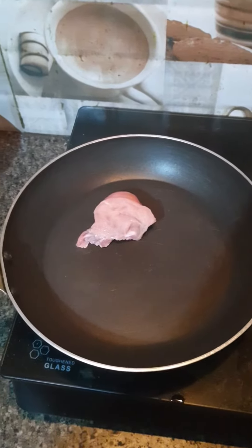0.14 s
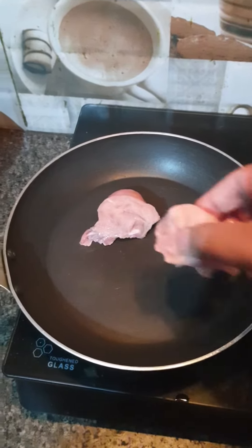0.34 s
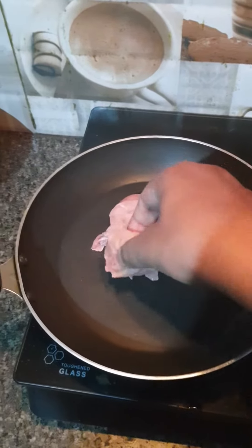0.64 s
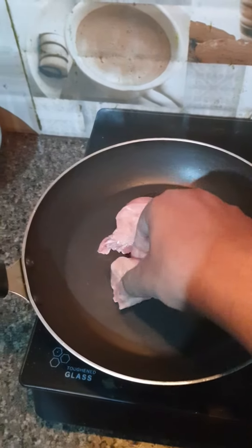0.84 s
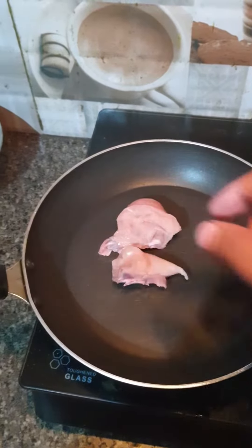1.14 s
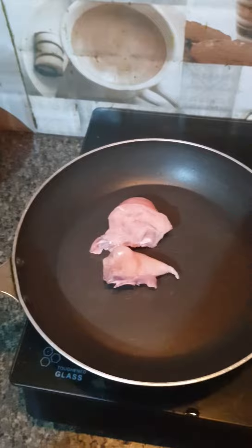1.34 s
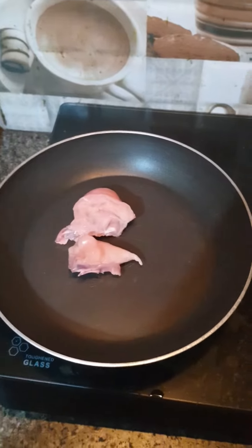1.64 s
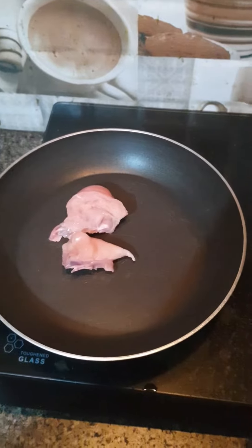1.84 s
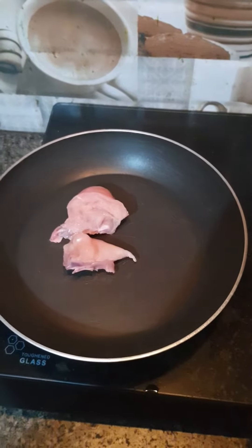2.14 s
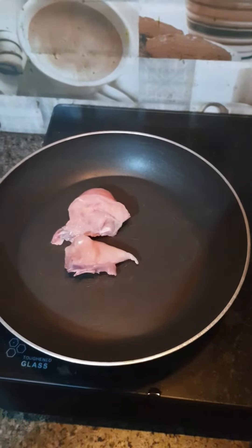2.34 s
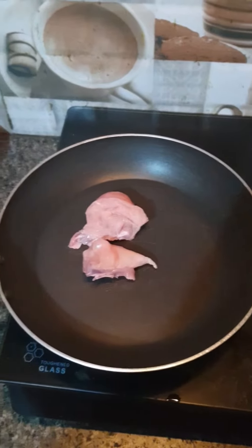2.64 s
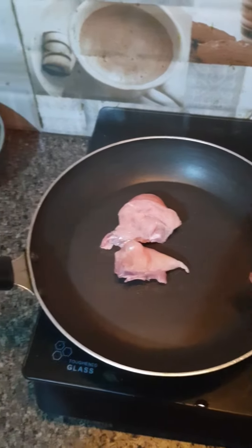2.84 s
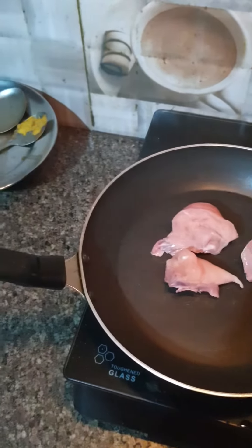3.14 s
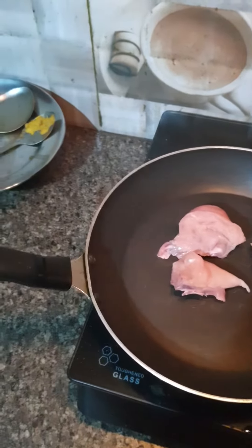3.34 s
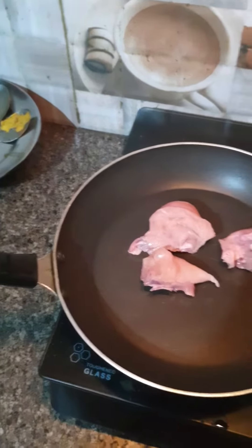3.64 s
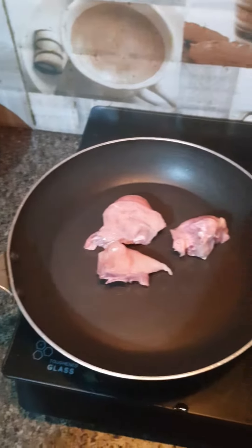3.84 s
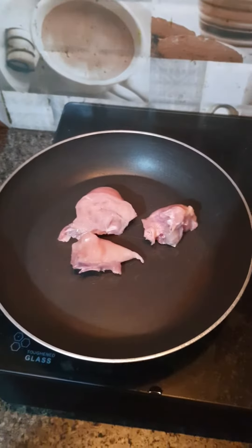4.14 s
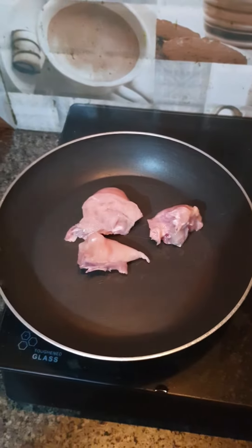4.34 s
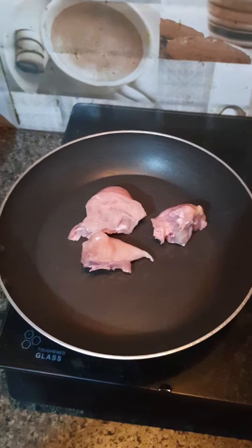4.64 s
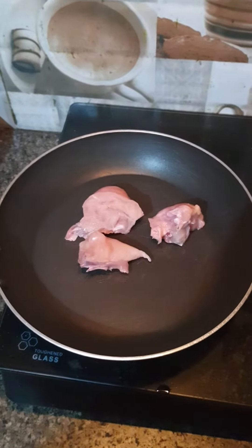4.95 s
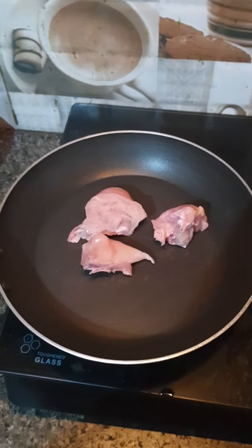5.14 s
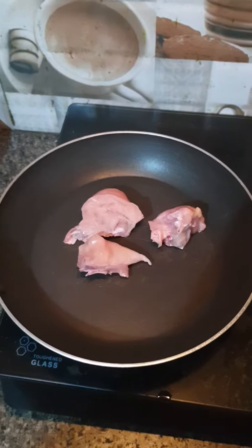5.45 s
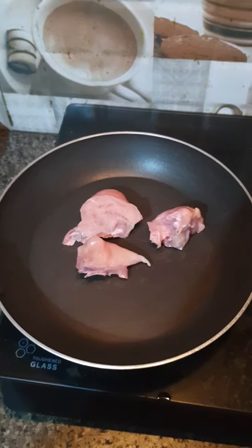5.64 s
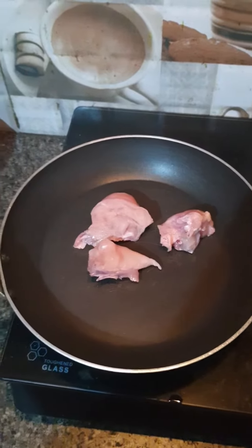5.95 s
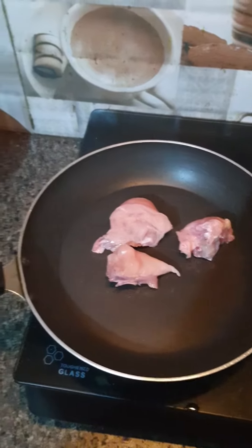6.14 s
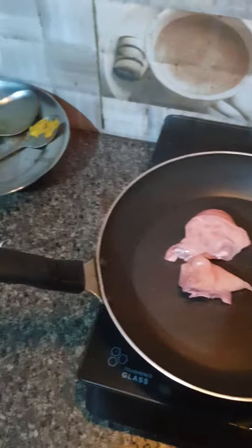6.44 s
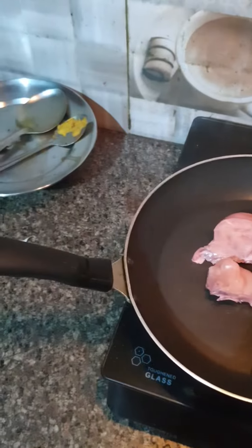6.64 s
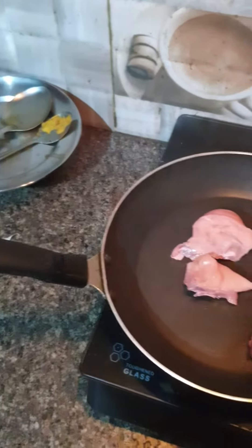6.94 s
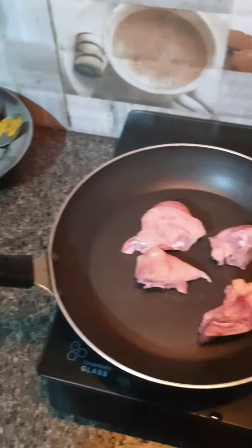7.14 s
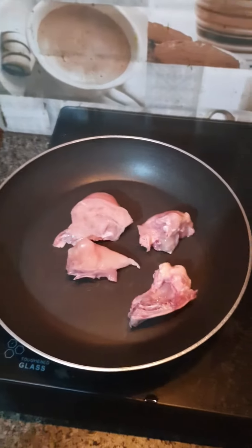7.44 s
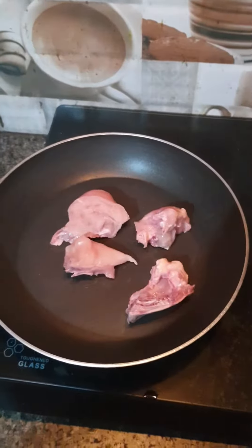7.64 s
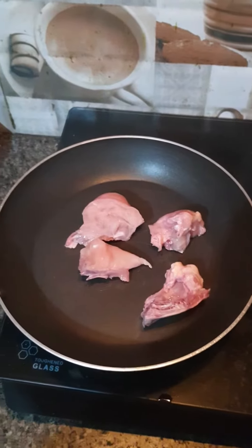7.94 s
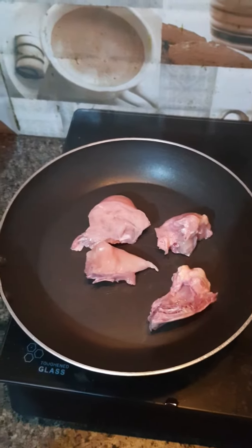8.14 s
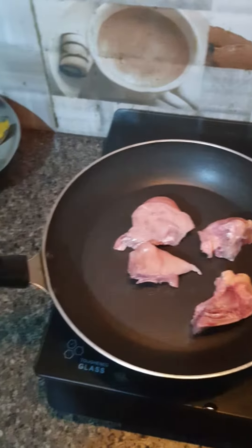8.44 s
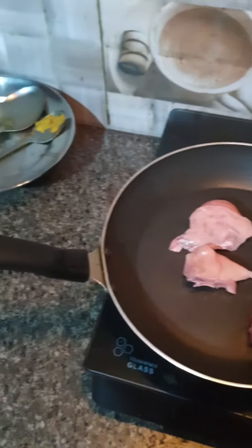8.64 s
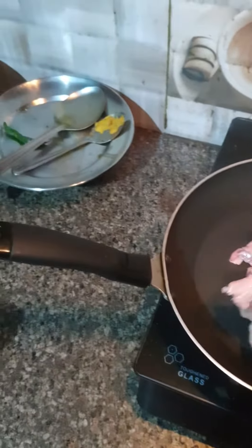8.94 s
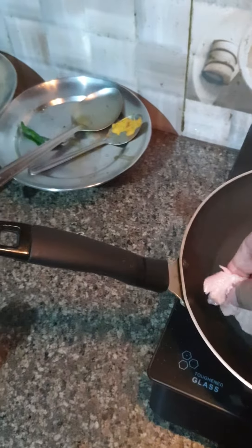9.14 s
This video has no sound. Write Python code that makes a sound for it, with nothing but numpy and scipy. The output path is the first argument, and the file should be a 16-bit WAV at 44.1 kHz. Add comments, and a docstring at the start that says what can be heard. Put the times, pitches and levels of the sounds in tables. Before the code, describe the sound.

Close phone pickup in a small kitchen: an induction cooktop hums low and its fan whirs throughout. Meat sizzles faintly, flares as a second piece flops in, then surges much louder after a steel clink when another is laid down. Sharp fat spits cluster through the middle with a clink and a counter thump, a further piece brings a fresh hiss, and the frying settles.

```python
"""Meat already fries in a pan on an induction cooktop, close to a phone in a small kitchen: bubble bursts make the hiss.
All along, sines at twice the mains rate and its octave make the coil hum; wavering tones and shaped noise make the fan.
A bump rings the counter, then a piece flops in: the sizzle surges, narrow noise bands hiss as steam, noise snaps spit.
Steel modes clink before a second piece goes in; more spits, clinks and bumps follow, and the housing sings briefly.
A third piece goes in near 7 s, a last clink and bump follow, and hum and fan air ease towards the end."""
import sys
import numpy as np
from scipy import signal
from scipy.fft import rfft, irfft
from scipy.io import wavfile

SR = 44100
rng = np.random.default_rng(int(sys.argv[2]) if len(sys.argv) > 2 else 0)


def bounce(signal):
    """Save signal as a 16-bit WAV file at the path given by the first command-line argument."""
    frames = np.transpose(np.atleast_2d(signal))
    limited = np.clip(frames, -1, 1)
    pcm = np.round(limited * 32767).astype(np.int16)
    wavfile.write(sys.argv[1], SR, pcm)


N = 409688
T = np.arange(N) / SR
FREQ = np.arange(N // 2 + 1) * SR / N
HUM_HZ = 99.95  # twice the mains rate
TOP_HZ = 15740  # upper limit of the phone

# pieces laid in the pan: start_s, rise_s, surge_db, settle_s (power falls to 1/e), lasting_db,
# fine_db and coarse_db (lasting spray and bubbling re main sizzle)
PIECES = [(1.09, 0.08, -39, 0.28, -32.5, -1.5, 0), (3.32, 0.28, -21.5, 0.21, -43.5, 9.5, 10.5),
          (6.83, 0.057, -28.5, 0.4, -37, -6, -8)]
# fan at the two ports: freq_hz, left_minus_right_db, likeness (-1 to 1)
FAN_STEREO = [(45, -2, .96), (80, -.3, .98), (130, -2.8, .96), (200, -.7, .97), (300, -4.5, .93),
              (400, -4, .93), (490, -2.8, .72), (700, -7.5, .62), (1300, -2.5, .1), (2500, -.5, .5),
              (8000, -2, .1)]


def undb(db):
    """Decibels to gain."""
    return 10 ** (np.asarray(db) / 20)


def unit(x):
    """Scale to rms 1."""
    return x / np.sqrt(np.mean(x ** 2))


def ports(pan_db):
    """Left and right gains for a left-minus-right level difference."""
    return undb(np.array([[.5], [-.5]]) * pan_db)


def across(table):
    """Columns of a table (Hz, ..) on the frequency grid, joined on a log axis."""
    hz, *columns = np.transpose(table)
    return [np.interp(np.log(FREQ + 1), np.log(hz), c) for c in columns]


def colour(x, gain):
    """Filter by a gain on the frequency grid."""
    return irfft(rfft(x) * gain, N)


def walk(rate_hz):
    """Smooth random signal of rms 1, low-passed near rate_hz."""
    return unit(colour(rng.standard_normal(N), 1 / (1 + (FREQ / rate_hz) ** 4)))


def band(x, lo_hz, hi_hz):
    """Causal band-pass."""
    sos = signal.butter(2, [lo_hz, min(hi_hz, SR / 2 - 1)], "band", fs=SR, output="sos")
    return signal.sosfilt(sos, x)


def fade(t, t60_s):
    """Exponential decay, 60 dB down after t60_s."""
    return np.exp(-np.log(1000) * t / t60_s)


def swell(middle_s, half_s):
    """Smooth rise and fall, 1 at its middle, 1/e at half_s either side."""
    return np.exp(-((T - middle_s) / half_s) ** 2)


def add(out, start_s, sound):
    """Mix a sound in at start_s."""
    i = int(start_s * SR)
    out[:, i:i + sound.shape[-1]] += sound[:, :N - i]


def struck(modes, t):
    """Free ring of a table of modes (Hz, dB, t60 s)."""
    return sum(undb(db) * np.sin(2 * np.pi * hz * t) * fade(t, t60_s) for hz, db, t60_s in modes)


def aside():
    """How far the hand swings the phone away from the pan, 0-1."""
    # swings aside and back: middle_s, half_s, reach (0-1)
    swings = [(0.844, 0.09, 0.8), (3.4, 0.95, 0.07), (6.665, 0.13, 1.0), (9.05, 0.66, 0.54)]
    return sum(reach * swell(middle_s, half_s) for middle_s, half_s, reach in swings)


def ripple(depth):
    """Gain that pulses with the power, twice in each mains cycle."""
    return 1 + depth * np.cos(2 * np.pi * HUM_HZ * T)


def frying():
    """Levels (dB) of main sizzle, spray and bubbling: each piece surges, settles and fries on; powers add."""
    # flares as wet meat touches metal or juice runs out: middle_s, half_s, level_db, fine_db (re level)
    flares = [(.6, 0.093, -43.5, -5), (.925, 0.073, -30.5, -2.5), (1.478, 0.29, -33.5, 0),
              (3.187, 0.096, -31.5, 2), (5.42, 0.13, -33, -7), (5.75, 0.17, -35, -5), (8, 0.45, -47, 9)]
    flare_coarse_db = -2.5
    first_db, first_fine_db, first_coarse_db = -39, -2.5, 2  # piece already frying
    surge_fine_db, surge_coarse_db = -0.5, 2.5
    parts = [(np.full(N, undb(first_db) ** 2), first_fine_db, first_coarse_db)]
    for start_s, rise_s, surge_db, settle_s, lasting_db, fine_db, coarse_db in PIECES:
        age_s = np.maximum(T - start_s, 0)
        contact = 1 - np.exp(-(age_s / rise_s) ** 2)
        surge = contact * undb(surge_db) ** 2 * np.exp(-age_s / settle_s)
        parts.append((surge, surge_fine_db, surge_coarse_db))
        parts.append((contact * undb(lasting_db) ** 2, fine_db, coarse_db))
    for middle_s, half_s, db, fine_db in flares:
        parts.append((undb(db) ** 2 * swell(middle_s, half_s), fine_db, flare_coarse_db))
    powers = sum(np.outer(undb([0, fine_db, coarse_db]) ** 2, power) for power, fine_db, coarse_db in parts)
    return 10 * np.log10(powers)


def bursts(per_second, spread_db, wash, scatter_s, room_db, room_t60_s, spots):
    """Steam bubbles burst at several spots; pan wall and tiles scatter each differently to the two ports."""
    out, t = 0, T[:SR // 4]
    for _ in range(spots):
        size = undb(spread_db * np.minimum(rng.exponential(size=N), 6))
        hits = rng.random(N) < per_second / spots / SR
        clicks = hits * size * rng.choice([-1, 1], N)
        decay = np.exp(-t / scatter_s) + undb(room_db) * fade(t, room_t60_s)
        paths = rng.standard_normal((2, len(t))) * decay
        out = out + signal.oaconvolve(clicks[None], paths, axes=1)[:, :N]
    return unit(unit(out) + wash * rng.standard_normal((2, N)))


def pan_ring(bubbling_db):
    """Noise rings the pan's resonances; random level changes at each, partly following the bubbling level."""
    # pan resonances: freq_hz, width_hz, level_db (before trim)
    pan_modes = [(1838, 32, -62), (2280, 200, -63), (2730, 80, -65), (3640, 120, -65), (3830, 90, -68)]
    trim_db, waver_db, follow = -0.4, 4.0, 0.38
    ring = 0
    for hz, width_hz, db in pan_modes:
        resonance = np.sqrt(SR / np.pi / width_hz) / (1 + 2j * (FREQ - hz) / width_hz)
        mode = colour(rng.standard_normal((2, N)), resonance)
        follow_db = follow * (bubbling_db - bubbling_db.mean())
        ring = ring + mode * undb(db + trim_db + follow_db + waver_db * walk(15))
    return ring


def sizzle():
    """Bubbles fry on hot metal, in three bands; the low band's level wavers at random, hiss shifts with phone."""
    # relative spectrum at each port: freq_hz, left_db_per_hz, right_db_per_hz
    spectrum = [(1300, -24, -26), (2360, -15, -15), (3200, -17, -15), (4000, -13, -13), (4850, -5, -4),
                (5400, -5, -2), (6100, -5.5, 0), (6800, -4.5, 3.3), (7600, -4, 4.8), (8400, -3.5, 1),
                (9100, -2.7, -4.5), (9600, -6, -10), (10100, -4.7, -11), (10700, -3.5, -5.6),
                (11400, -2, .7), (12200, -.5, 3.8), (13000, .4, 1.9), (14000, -1, -1.1), (14700, 1, 0),
                (15700, 1.2, .1)]
    coarse_below_hz, fine_above_hz = 5800, 10800
    flicker_db, low_waver_db, fine_trim_db = 0.2, 1.24, 0.8
    aside_pan_db, ripple_depth = -2.5, .007
    fry_db, spray_db, bubbling_db = frying() + flicker_db * np.array([walk(9.0) for _ in range(3)])
    steam = bursts(per_second=3500, spread_db=2.8, wash=0.52, scatter_s=0.00026,
                   room_db=-1.5, room_t60_s=0.097, spots=8)
    steam = unit(colour(steam, undb(across(spectrum))))
    fine = 1 / (1 + (fine_above_hz / (FREQ + 1)) ** 12)
    coarse = 1 / (1 + (FREQ / coarse_below_hz) ** 12)
    hiss = colour(steam, coarse) * undb(bubbling_db + low_waver_db * walk(15))
    hiss += colour(steam, 1 - coarse - fine) * undb(fry_db)
    hiss += colour(steam, fine) * undb(spray_db + fine_trim_db)
    return (hiss * ports(aside_pan_db * aside()) + pan_ring(bubbling_db)) * ripple(ripple_depth)


def steam_jets():
    """Steam squeezes out under the meat: a narrow noise band that holds or glides in pitch and flutters."""
    # jets: start_s, length_s, start_hz, end_hz, width_hz, level_db (before flutter), left_minus_right_db
    jets = [(1, 0.72, 6750, 6540, 660, -48.5, -18), (1, .65, 11000, 11000, 1900, -42, 2),
            (6.1, 1.1, 7800, 7260, 1300, -45, -12.5), (7.4, 0.69, 3100, 5290, 1018, -46, 1),
            (7.2, 2.2, 5300, 4910, 700, -50, -1)]
    edge_s, flutter_db = 0.083, 1.0
    out = np.zeros((2, N))
    for start_s, length_s, start_hz, end_hz, width_hz, db, pan_db in jets:
        gate = np.clip(np.minimum(T - start_s, start_s + length_s - T) / edge_s + .5, 0, 1)
        centre_hz = np.interp(T, [start_s, start_s + length_s], [start_hz, end_hz])
        low_pass = signal.butter(2, width_hz / 2, fs=SR, output="sos")
        rush = signal.sosfilt(low_pass, rng.standard_normal((2, N)))
        hiss = unit(rush * np.cos(2 * np.pi * np.cumsum(centre_hz) / SR))
        out += hiss * gate * undb(db) * ports(pan_db)
    return out * undb(flutter_db * walk(16))


def wall_echo(x):
    """A near reflection combs the hiss; its path drifts as the hand holding the phone moves."""
    lag_s, drift, share = .0015, .06, .18  # drift: rms fraction of the lag
    i = np.arange(N)
    delayed = [np.interp(i - lag_s * SR * (1 + drift * walk(0.46)), i, side) for side in x]
    return x + share * np.array(delayed)


def small_spits():
    """Small spits of fat at random moments after the first of the added pieces is laid in."""
    rate_hz, peak_db, scatter_db = 2.5, -24, 1.5  # count = rate times the whole length
    low_hz, treble_db, t60_s = 5500, 2, .005
    count = int(rate_hz * T[-1])
    times_s = rng.uniform(PIECES[0][0], T[-1], count)
    sizes = rng.standard_normal(count)
    return [(s, peak_db + scatter_db * size, low_hz, treble_db, t60_s) for s, size in zip(times_s, sizes)]


def spits():
    """A droplet explodes in the fat: a sharp noise snap and a short splash of reflections."""
    # loud spits: start_s, peak_db (mean of ports), low_hz, treble_db (gain re middle band), t60_s
    loud_spits = [(2.058, -22, 5500, 2, .006), (3.997, -17, 6500, 7, .004), (4.204, -13, 5400, 1, .03),
                  (4.428, -15.5, 5500, 6, .004), (4.675, -22, 4600, -3, .015), (5.378, -16, 6000, 5, .02),
                  (5.7455, -11.7, 5800, 5, .005), (5.799, -20, 7000, 6, .006),
                  (5.9405, -12.5, 5600, 4, .011), (5.953, -20, 5500, 0, .015)]
    tail_db, tail_t60_s, pan_db = -25, 0.11, -2
    out, t = np.zeros((2, N)), T[:SR // 8]
    for start_s, db, low_hz, treble_db, t60_s in loud_spits + small_spits():
        decay = fade(t, t60_s) + undb(tail_db) * fade(t, tail_t60_s)
        burst = rng.standard_normal((2, len(t))) * decay
        snap = band(burst, low_hz, 10500) + undb(treble_db) * band(burst, 11000, TOP_HZ)
        snap /= np.abs(snap).max(axis=1, keepdims=True)
        add(out, start_s, undb(db) * snap * ports(pan_db))
    return out


def flops():
    """Soft meat, let go by the fingers, drops on the pan, which answers with a short dull knock."""
    # flops: start_s, level_db
    drops = [(1.036, -36)]
    # loaded pan modes: freq_hz, level_db, t60_s
    thud_modes = [(335, -1, .12), (372, -3, .12), (662, 0, .16), (698, -2, .16), (1010, -12, .08)]
    push_s = .008
    out, t = np.zeros((2, N)), T[:SR // 4]
    for start_s, db in drops:
        knock = struck(thud_modes, t) * (1 - np.exp(-t / push_s))
        add(out, start_s, undb(db) * knock * ports(-6))
    return out


def clinks():
    """Steel touches steel: a brief chatter of contact rings a few modes over scrape and duller clatter."""
    # clinks: start_s, level_db, lowest_ring_hz, tilt_db_per_octave, scrape_db (re clink)
    contacts = [(3.116, -32.5, 1868, -16, -16), (3.122, -33.5, 1868, -1, -11), (3.133, -38, 1856, 4, -4),
                (5.6215, -38, 2165, -7, 11), (5.628, -40, 2290, -3, 11), (7.521, -33, 3644, -12, 9),
                (7.526, -39.5, 3460, -14, 8)]
    # thin steel modes: ratio (to lowest ring), level_db, t60_s
    steel_modes = [(1, -3, .09), (1.05, -12, .04), (1.5, -4, .06), (1.64, -11, .015), (1.87, -10, .015),
                   (2.055, -4, .06), (2.4, -14, .03)]
    contact_t60_s, scrape_t60_s = 0.07, 0.11
    clatter_db, clatter_t60_s = -8, 0.2
    out, t = np.zeros((2, N)), T[:SR // 2]
    for start_s, db, hz, tilt_db, scrape_db in contacts:
        contact, scrape, clatter = rng.standard_normal((3, 2, len(t)))
        chatter = contact * fade(t, contact_t60_s)
        sound = undb(scrape_db) * band(scrape, 3900, 8400) * fade(t, scrape_t60_s)
        sound += undb(clatter_db) * band(clatter, 900, 4400) * fade(t, clatter_t60_s)
        for ratio, mode_db, t60_s in steel_modes:
            mode = np.sin(2 * np.pi * hz * ratio * t) * fade(t, t60_s)
            ring = signal.fftconvolve(chatter, mode[None])[:, :len(t)]
            sound += undb(mode_db + tilt_db * np.log2(ratio)) * ring / np.abs(ring).max()
        add(out, start_s, undb(db) * sound)
    return out


def bumps():
    """A soft push rings the counter, booms in the cupboard below and shakes what stands on it."""
    # bumps: start_s, level_db
    pushes = [(.535, -31), (5.624, -35), (5.763, -20.5), (5.830, -32), (7.526, -33)]
    # counter and cooktop body modes: freq_hz, level_db, t60_s
    counter_modes = [(83, 1, .33), (136.6, -8, .13), (256, -12, .12), (318, -11, .15), (385, -12, .15),
                     (970, -23, .15), (1040, -21, .15), (1165, -23, .2)]
    push_s = .005
    rattle_db, rattle_t60_s = -5.5, .32
    boom_db, boom_t60_s = 2.5, .3
    out, t = np.zeros((2, N)), T[:SR // 2]
    for start_s, db in pushes:
        rattle = undb(rattle_db) * band(rng.standard_normal((2, len(t))), 200, 1200) * fade(t, rattle_t60_s)
        boom = undb(boom_db) * band(rng.standard_normal(len(t)), 50, 250) * fade(t, boom_t60_s)
        onset = 1 - np.exp(-t / push_s)
        add(out, start_s, undb(db) * (struck(counter_modes, t) + rattle + boom) * onset)
    return out


def coil():
    """Magnetic pull shakes pan and coil twice per mains cycle; the hum wavers and drops as the phone swings."""
    start_db, aside_db, sag_db, waver_db, octave_db = -30, -3, -2, 0.5, -29
    phase = 2 * np.pi * HUM_HZ * T + np.array([[0], [.25]])  # right port leads, rad
    tone = (np.sin(phase) + undb(octave_db) * np.sin(2 * phase)) * ports(-.7)
    level_db = start_db + aside_db * aside() + sag_db * (T / T[-1]) ** 2 + waver_db * walk(3.3)
    return np.sqrt(2) * tone * undb(level_db)


def fan_tones():
    """Fan and motor tones share the wandering shaft speed; turbulence makes each one flutter."""
    # tones: pitch_hz, level_db (before trim and panning), unsteadiness (0-1)
    tones = [(44, -65, .5), (49.5, -61, .6), (53, -58.5, .6), (66, -45.7, .15), (78, -54.5, .6),
             (93.5, -54.5, .5), (122, -54, .3), (132, -61, .1), (144, -53, .3), (176, -59.3, .4),
             (188, -63.7, .2), (220.5, -59.5, .3), (258, -61, 1), (298, -61, .8), (320.3, -51.3, .5),
             (324, -56, .7), (330.7, -53.3, .5), (342.7, -49.5, .35), (354, -60, .5), (376.3, -53, .4),
             (388, -57, .5), (408.5, -63.5, .6), (440.5, -65, .4), (490, -65, 1), (506.5, -62.5, .8),
             (554, -61.5, .5), (710.5, -65.5, .7)]
    wander, flutter_hz, trim_db = 0.0015, 3, 1.0  # wander: rms fraction of speed
    clock_s = T + wander * np.cumsum(walk(1)) / SR
    out = np.zeros(N)
    for hz, db, unsteady in tones:
        phase = 2 * np.pi * (hz * clock_s + rng.random())
        tone = (1 + unsteady * walk(flutter_hz)) * np.sin(phase)
        tone += unsteady * walk(flutter_hz) * np.cos(phase)
        out += undb(db + trim_db) * unit(tone)
    right_lead = np.exp(np.array([[0], [.2]]) * 1j)  # rad
    return colour(out, ports(across(FAN_STEREO)[0]) * right_lead)


def fan_air():
    """Turbulent air rings the housing, most alike at both ports in the bass; it eases towards the end."""
    # air through the housing, relative spectrum: freq_hz, density_db_per_hz
    air_spectrum = [(20, -26), (36, -21), (46, -27), (85, -3), (115, -3), (165, -12.5), (235, -16),
                    (335, -9.5), (460, -19.5), (700, -19.5), (1400, -25), (3000, -35), (8000, -31.5)]
    # housing resonances: freq_hz, width_hz, lift_db
    housing_modes = [(258, 7.3, -1), (413, 42, 4.5), (499.6, 26, 7), (623, 18, 5.5), (713, 29, 3)]
    start_db, late_db = -40, -2
    pan_db, likeness = across(FAN_STEREO)
    likeness = np.clip(likeness, -1, 1)
    mid, side = rfft(rng.standard_normal((2, N)))
    pair = np.sqrt(1 + likeness) * mid + np.sqrt(1 - likeness) * side * np.array([[1], [-1]])
    lift_db = sum(db / (1 + (2 * (FREQ - hz) / width_hz) ** 2) for hz, width_hz, db in housing_modes)
    air = unit(irfft(pair * ports(pan_db) * undb(across(air_spectrum)[0] + lift_db), N))
    return air * undb(start_db + late_db * (T / T[-1]) ** 2)


def housing_song():
    """One resonance of the housing sings out for a moment."""
    middle_s, half_s, pitch_hz, level_db = 6.27, .06, 507, -49
    return np.sqrt(2) * undb(level_db) * swell(middle_s, half_s) * np.sin(2 * np.pi * pitch_hz * T)


def scene():
    """Pan, small kitchen noises and cooktop."""
    pan = wall_echo(sizzle() + steam_jets()) + spits() + flops()
    kitchen = clinks() + bumps()
    fan = (fan_tones() + fan_air()) * ripple(.035)
    return pan + kitchen + coil() + fan + housing_song()


def record(dry):
    """The phone cuts the top with a steep low-pass."""
    return signal.sosfilt(signal.ellip(10, .2, 70, TOP_HZ, fs=SR, output="sos"), dry)


dry = scene()
out = record(dry)
bounce(out)
```